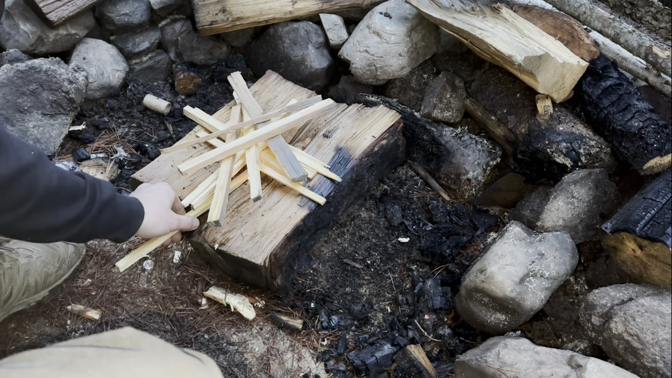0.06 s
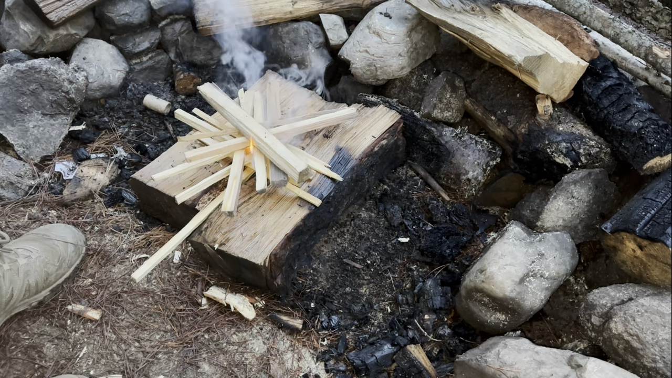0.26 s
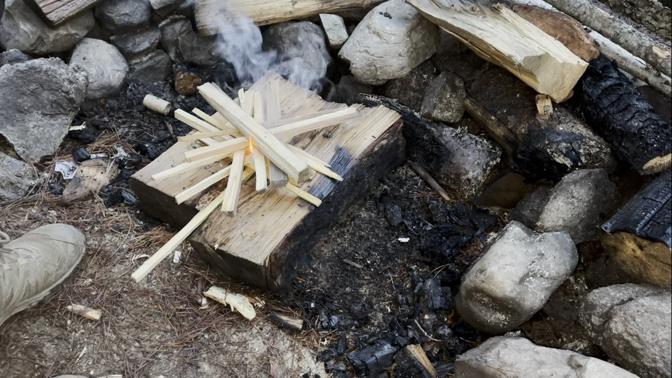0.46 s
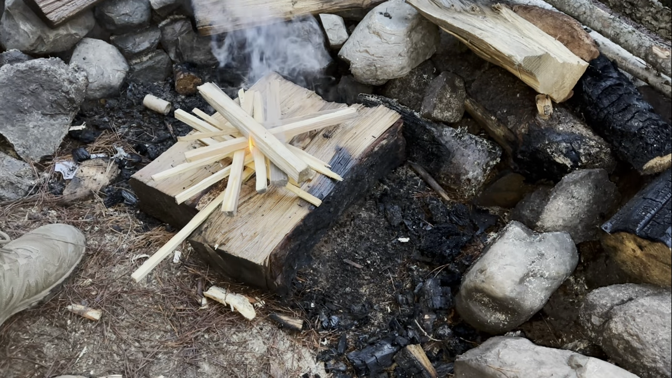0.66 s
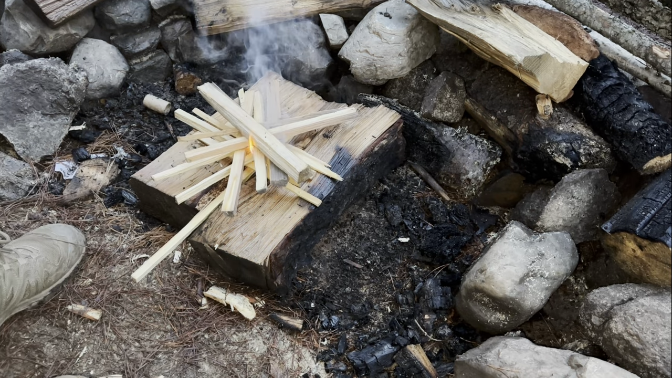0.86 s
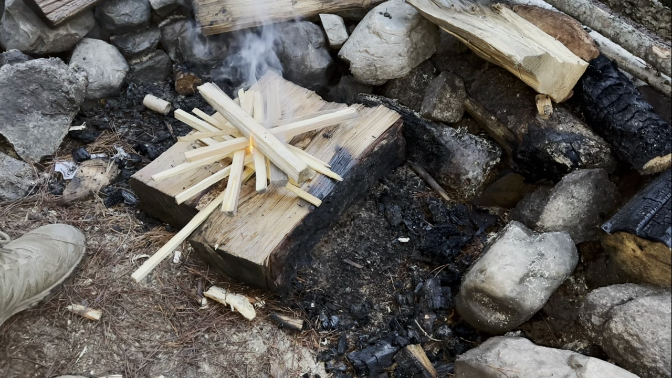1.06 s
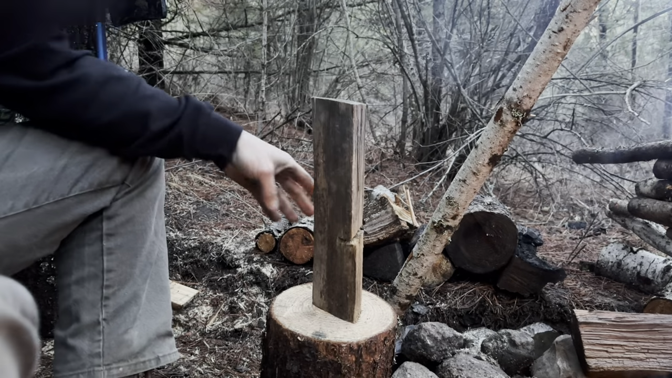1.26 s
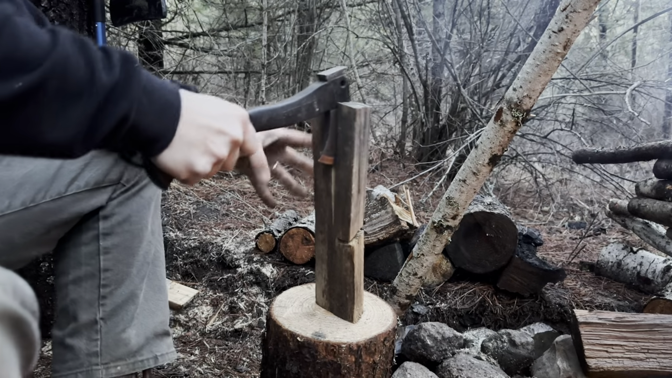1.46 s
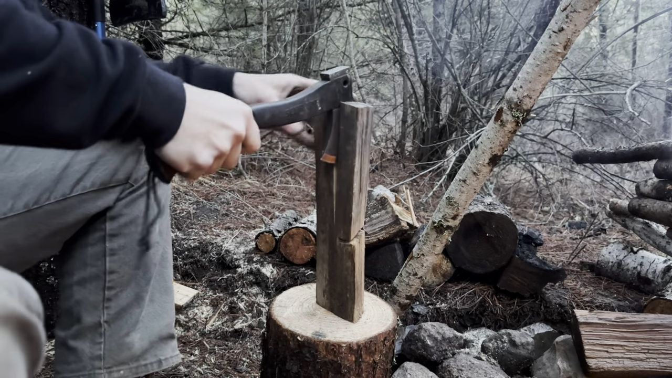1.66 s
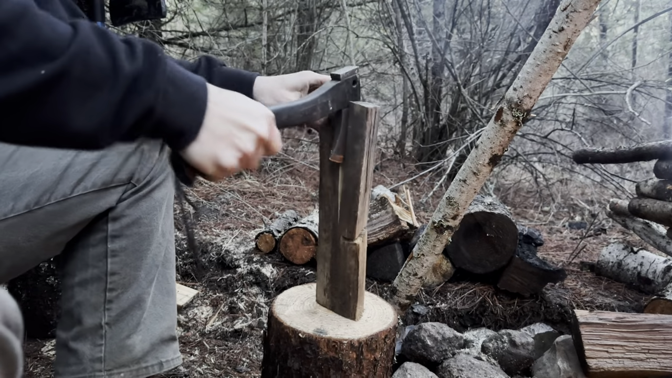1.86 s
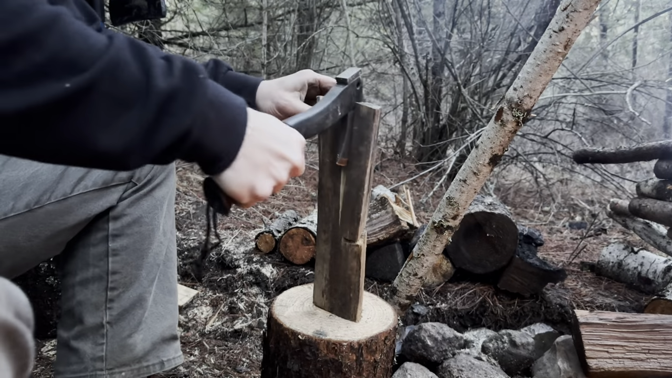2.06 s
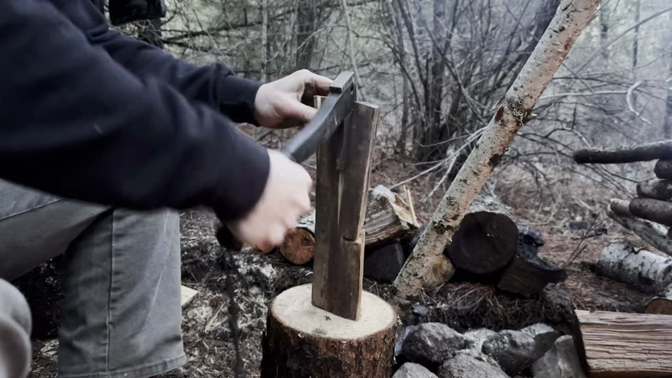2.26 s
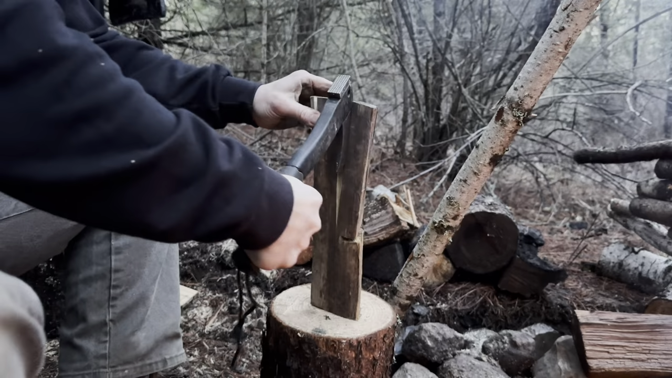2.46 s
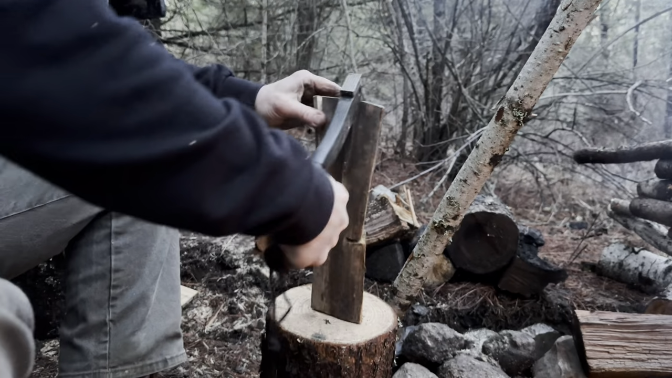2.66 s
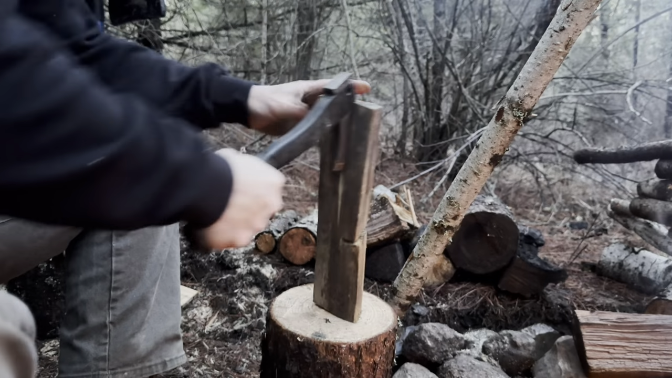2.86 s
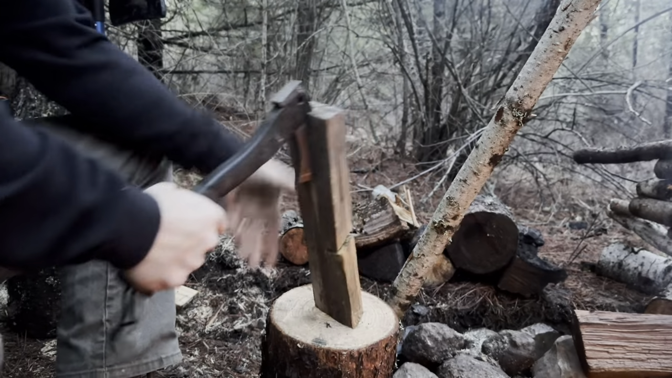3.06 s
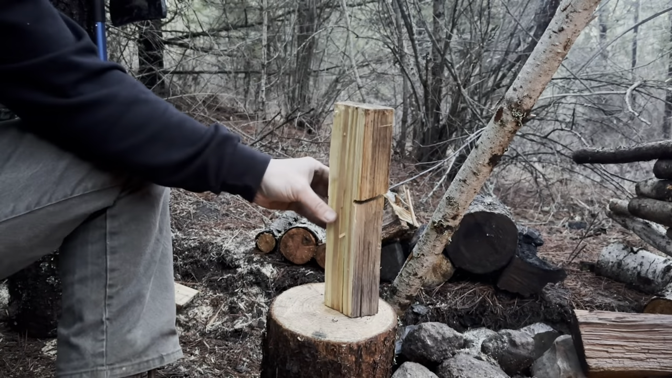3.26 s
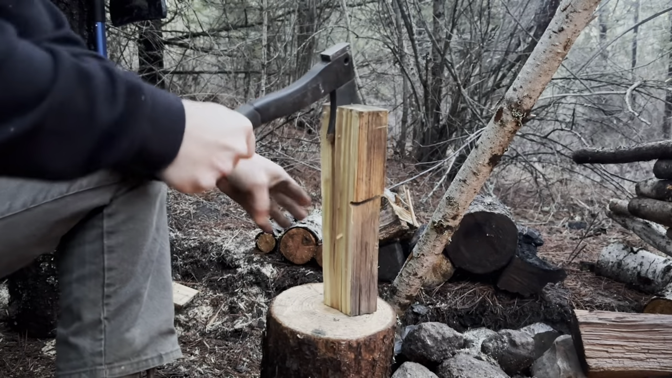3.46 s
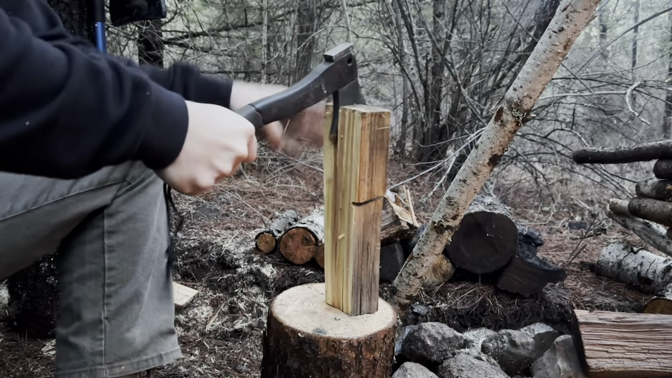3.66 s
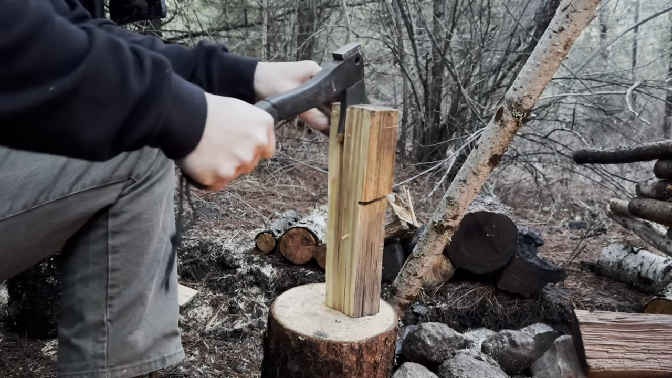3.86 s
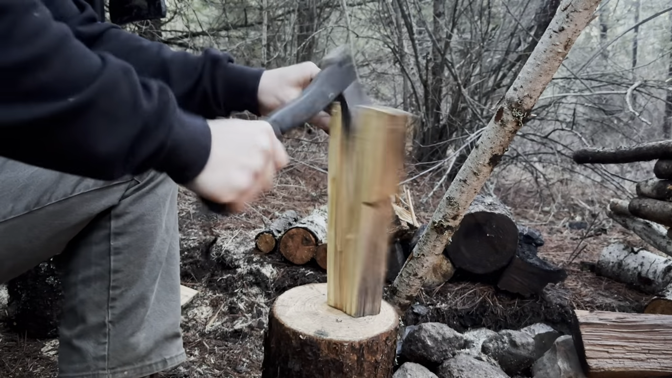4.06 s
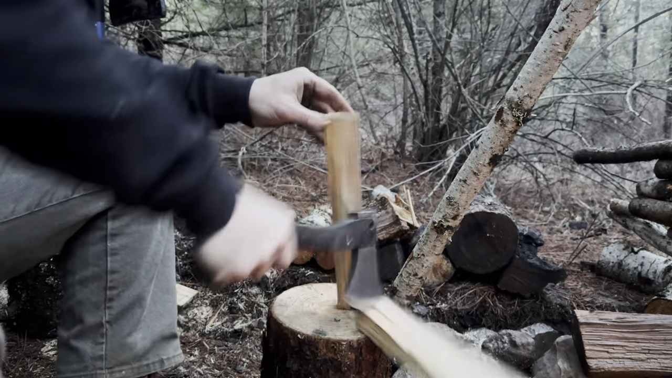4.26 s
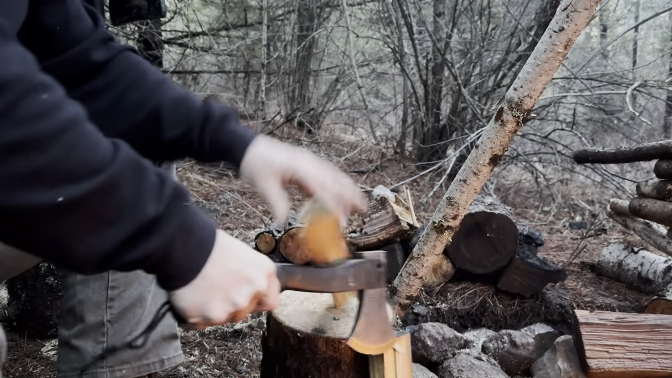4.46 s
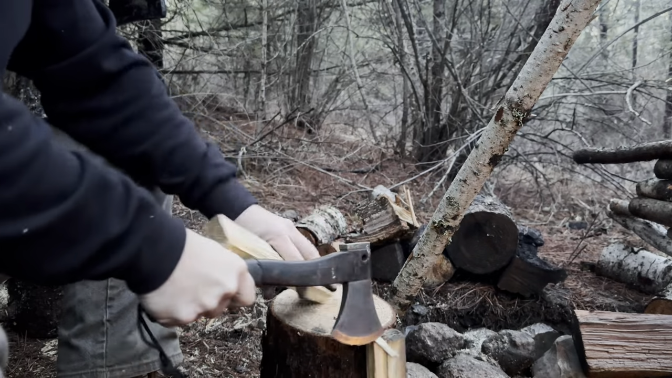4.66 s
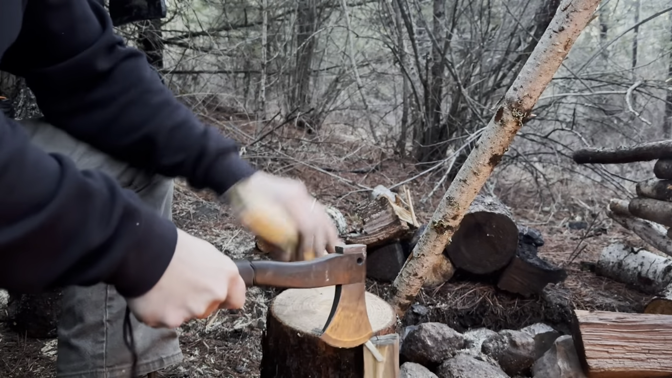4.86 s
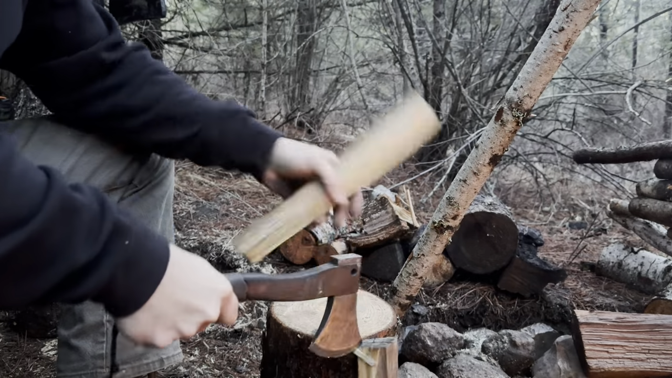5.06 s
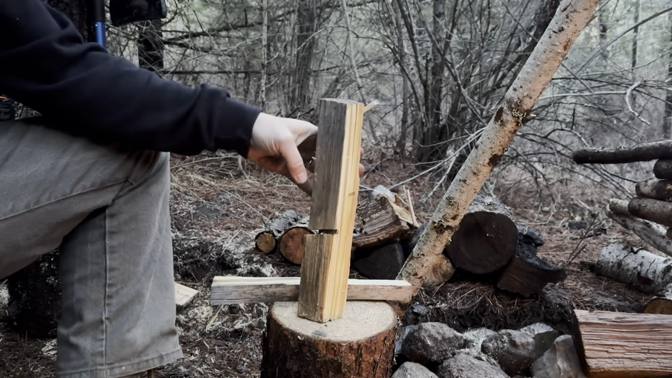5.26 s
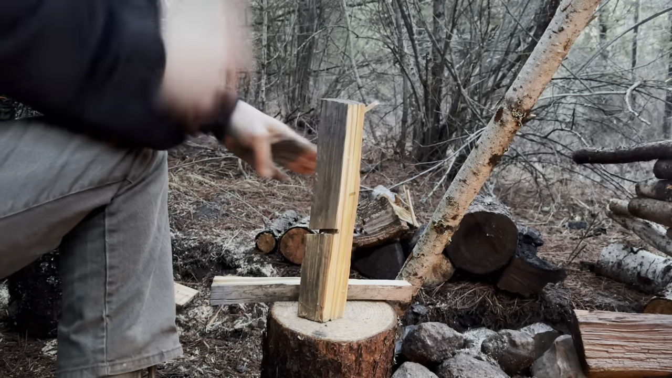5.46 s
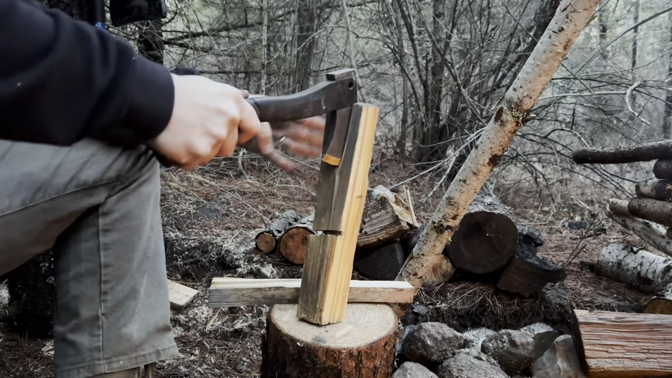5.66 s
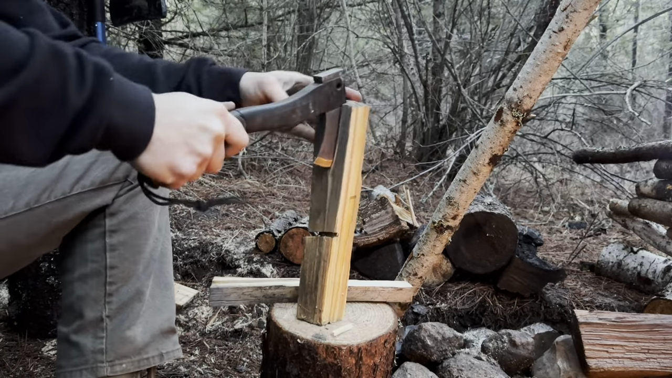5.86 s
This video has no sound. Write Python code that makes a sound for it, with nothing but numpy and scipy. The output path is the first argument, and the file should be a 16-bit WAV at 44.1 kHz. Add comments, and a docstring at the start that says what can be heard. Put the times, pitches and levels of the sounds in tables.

```python
"""Over a low rumble and faint air in the woods, clothes rustle, boots shuffle and small taps lead up to the first blow.
A hatchet bites into a billet (a short log) on a stump, and billet and hatchet are knocked down together, blow by blow.
The wood cracks, tears apart and the pieces tumble; the next billet is set up, and a last blow cracks it.
Random snaps of fibre, filtered and sent through ringing wood, make the blows; scattered echoes give a faint tail."""
import sys
import numpy as np
from scipy import signal
from scipy.fft import rfft, irfft, next_fast_len
from scipy.io import wavfile
from scipy.ndimage import uniform_filter1d

SR = 44100
rng = np.random.default_rng(int(sys.argv[2]) if len(sys.argv) > 2 else 0)


def dump_mix(stems):
    """Bounce the given channels to the path in sys.argv[1] as a 16-bit WAV at rate SR."""
    frames = np.atleast_2d(stems).T  # one column per channel
    limited = np.clip(frames, -1, 1)  # hard clip at full scale
    pcm = np.round(limited * 32767).astype(np.int16)
    wavfile.write(sys.argv[1], SR, pcm)


N = 260631

BLOW_SAMPLES = 8192  # room for one short wooden sound
LEAD_IN_S = .003  # each short wooden sound swells in for this long before its main push

# The hatchet strikes. Each row: time in seconds, time over which fibres snap in seconds, knock in Hz,
# knock level in dB, clack in Hz, clack level in dB, crack level in dB, thump delay in seconds, thump level in dB.
CHOP_BLOWS = [(1.2969, 0.0012, 562, -28, 2100, -21.5, -19, .011, -37.5),
              (2.273, .0013, 660, -36.5, 2040, -31.5, -24.5, 0, -38.5),
              (3.3443, 0.0021, 857, -19.5, 1949, -19, -17, 0.014, -38.5),
              (4.033, 0.0027, 1027, -45, 1695, -26, -19.5, .003, -69),
              (5.4585, .0029, 780, -21.5, 1700, -20.5, -19.5, .008, -38)]
# Split pieces and the hatchet land on stump and ground. Each row: time in seconds, knock in Hz,
# knock level in dB, crack level in dB, thump level in dB, left minus right in dB.
PIECE_LANDINGS = [(4.089, 857, -37, -39, -40.5, 1.5), (4.213, 406, -43.5, -49, -58, -3),
                  (4.2281, 611, -31, -42, -38.5, -2), (4.2481, 453, -30.5, -47, -51, -1),
                  (4.3746, 568, -28, -30, -37, -4), (4.415, 454, -50, -67, -43, 3),
                  (4.458, 556, -42, -66, -42.5, 3)]
# Colour of the cracks as heard through the microphones: bright near 8.6 kHz, hollow near 11 kHz.
# Each row: frequency in Hz, level in dB.
CRACK_SPECTRUM = [(1000, -35), (2500, -18.5), (3500, -2.5), (4600, -4), (6200, -5.5), (7200, -2),
                  (8600, 2.5), (9500, -3.5), (10300, -25), (11400, -29.5), (13000, -8.5), (15500, -16)]


def from_db(db):
    """Turn decibels into a gain."""
    return 10 ** (np.asarray(db) / 20)


def rms_one(x):
    """Scale a sound to an average (rms) strength of 1."""
    return x / np.sqrt(np.mean(x ** 2) + 1e-20)


def burst(x, db):
    """Scale a short sound so that its energy, spread over 10 ms, has this level."""
    energy = np.mean(np.sum(x ** 2, axis=-1))
    return x * from_db(db) / np.sqrt(energy / (.01 * SR) + 1e-20)


def at_hz(points, hz):
    """Read each column of a spectrum at these frequencies, on a logarithmic pitch scale."""
    f, *columns = np.transpose(points)
    return [np.interp(np.log(np.maximum(hz, 1)), np.log(f), column) for column in columns]


def coloured(x, spectrum):
    """Give a sound this spectrum with a filter that never answers early (minimum phase)."""
    size = 2 * next_fast_len(x.shape[-1])
    level_db = at_hz(spectrum, np.fft.rfftfreq(size, 1 / SR))[0]
    # folding the cepstrum onto positive times makes the filter minimum-phase
    cepstrum = irfft(np.log(from_db(level_db)))
    cepstrum[1:size // 2] *= 2
    cepstrum[size // 2 + 1:] = 0
    return irfft(rfft(x, size) * np.exp(rfft(cepstrum)))[..., :x.shape[-1]]


def band(x, hz, spread, order=2):
    """A broad, quickly damped resonance around hz."""
    ratio = 1 + abs(spread)
    edges = [hz / ratio, min(hz * ratio, .45 * SR)]
    return signal.sosfilt(signal.butter(order, edges, "band", fs=SR, output="sos"), x + 1e-18)


def ring(x, modes, detune):
    """Decaying tones; every contact point gives them other strengths and slightly other pitches."""
    t = np.arange(BLOW_SAMPLES) / SR
    luck = rng.standard_normal((len(modes), 2))
    tone = 0
    for (hz, db, t60), (strength, pitch) in zip(modes, luck):
        fade = from_db(db + 2 * strength - 60 * t / t60)
        tone = tone + fade * np.sin(2 * np.pi * hz * (1 + detune * pitch) * t)
    return signal.fftconvolve(x, tone[None], axes=-1)[:, :BLOW_SAMPLES]


def add(out, s, x):
    """Mix a short sound in at time s."""
    start = round(s * SR)
    out[:, start:start + x.shape[-1]] += x[:, :N - start]


def grains(size, per_s, spread_db, apart):
    """Random snaps of uneven strength; each microphone also gets some of its own."""
    strength_db = spread_db * np.minimum(rng.exponential(1, (3, size)), 4)
    sizes = from_db(strength_db) * rng.choice([-1, 1], (3, size))
    snaps = sizes * (rng.random((3, size)) < per_s / SR)
    return rms_one(snaps[0] + apart * snaps[1:])


def surge(s, rise_s, fall_s):
    """An envelope that grows to 1 at time s and dies away."""
    t = np.arange(N) / SR - s
    growth = np.minimum(t / max(rise_s, 1e-4), -t / max(fall_s, 1e-4))
    return np.exp(np.maximum(growth, -40))


def together(gains):
    """Unrelated sounds add in power."""
    return np.sqrt(sum(gain ** 2 for gain in gains))


def flutter():
    """Cloth catches and slips, so its level wavers at random."""
    flutter_db, flutter_s = 2.5, 0.027
    width = max(round(flutter_s * SR), 1)
    slow = uniform_filter1d(uniform_filter1d(rng.standard_normal(N), width), width)
    return from_db(flutter_db * rms_one(slow))


def movement():
    """Gains of rustle, rubbing, shuffle and rumble: rest, single movements, and a swing into every chop."""
    # Arms and legs move. Each row: time in seconds, half length in seconds, rustling level in dB,
    # cloth rubbing level in dB, shuffling level in dB.
    moves = [(1.195, 0.1, -84.5, -99, -64), (1.83, 0.17, -72.5, -81, -82),
             (2.203, 0.061, -69.5, -69.5, -64.5), (2.45, .12, -83.5, -88, -69.5),
             (2.75, 0.082, -75.5, -81.5, -68.5), (2.964, 0.1, -69, -97, -71),
             (3.116, 0.089, -64, -68.5, -71), (3.183, 0.029, -55.5, -64.5, -85),
             (3.861, 0.22, -79.5, -89, -85), (4.279, 0.012, -52.5, -62, -67),
             (4.347, 0.033, -57.5, -67, -65), (4.552, 0.18, -62.5, -77, -73),
             (4.852, 0.44, -70, -81, -65.5), (5.172, 0.032, -67.5, -76, -69),
             (5.782, 0.25, -75.5, -81, -70.5)]
    rest_rustle_db, rest_shuffle_db = -84, -76
    swing_rustle_db, swing_shuffle_db, swing_rise_s, swing_stop_s = -61.5, -65, .06, .03
    rumble_db, rumble_over_shuffle_db = -62.5, 9
    shudder_over_thump_db, shudder_rise_s, shudder_fall_s = -8, .012, 0.065

    t = np.arange(N) / SR
    # the arm swings faster and faster, and stops
    swings = sum(surge(s, swing_rise_s, swing_stop_s) for s, *_ in CHOP_BLOWS)
    rustle = [from_db(rest_rustle_db), from_db(swing_rustle_db) * swings]
    shuffle = [from_db(rest_shuffle_db), from_db(swing_shuffle_db) * swings]
    rub = []
    for s, half_s, rustle_db, rub_db, shuffle_db in moves:
        swell = np.exp(-np.minimum(((t - s) / half_s) ** 2, 40))
        rustle.append(from_db(rustle_db) * swell)
        rub.append(from_db(rub_db) * swell)
        shuffle.append(from_db(shuffle_db) * swell)

    # the ground shudders after each chop, and the rumble swells with the shuffling
    shudder = sum(from_db(thump_db + shudder_over_thump_db)
                  * surge(s + 2 * shudder_rise_s, shudder_rise_s, shudder_fall_s)
                  for s, *_, thump_db in CHOP_BLOWS)
    rumble = [from_db(rumble_db), from_db(rumble_over_shuffle_db) * together(shuffle), shudder]
    return together(rustle), together(rub), together(shuffle), together(rumble)


def background():
    """Cloth and dry needles rustle, boots shuffle, and the air rumbles and hisses faintly."""
    # Four colours as heard through the microphones: rustle, shuffle, rumble and steady forest air.
    # Each row: frequency in Hz, level in dB.
    rustle_spectrum = [(400, -16.5), (1200, -3.5), (2200, -5.5), (3100, -8), (4500, -5.5), (5900, -7.5),
                       (8600, 0), (9500, -5.5), (10500, -32), (12000, -29.5), (13500, -13.5), (16000, -16)]
    shuffle_spectrum = [(60, -14.5), (160, 8), (300, -3.5), (550, -0.5), (1000, -12.5), (2500, -45)]
    rumble_spectrum = [(15, -32), (30, -16), (50, 3.5), (75, 4.5), (110, 0), (160, -8.5), (260, -20.5),
                       (600, -42), (2000, -65.5)]
    air_spectrum = [(200, 4), (450, -2), (900, -9.5), (1500, -10), (2300, -6), (4000, -14.5), (6000, -17.5),
                    (8500, -23), (9700, -26), (11000, -37.5), (13500, -36.5), (16000, -37)]
    # The background dips briefly. Each row: time in seconds, half width in seconds, depth in dB.
    dips = [(0.12, 0.015, -16), (1.122, 0.017, -25), (3.231, 0.0087, -26.5), (5.259, 0.018, -17)]
    air_db, rub_hz = -79, 2100

    rustle_gain, rub_gain, shuffle_gain, rumble_gain = movement()
    dense = grains(N, per_s=2900, spread_db=3.0, apart=1.1)
    sparse = grains(N, per_s=580, spread_db=0.5, apart=.6)
    cloth = dense + from_db(-10.5) * sparse
    rustle = rustle_gain * flutter() * rms_one(coloured(cloth, rustle_spectrum))
    scuffs = grains(N, per_s=700, spread_db=2.5, apart=.4)
    shuffle = shuffle_gain * rms_one(coloured(scuffs, shuffle_spectrum))
    rumbling = grains(N, per_s=3600, spread_db=1.0, apart=.1)
    rumble = rumble_gain * rms_one(coloured(rumbling, rumble_spectrum))
    hiss = grains(N, per_s=28000, spread_db=2.0, apart=0.23)
    air = from_db(air_db) * rms_one(coloured(hiss, air_spectrum))
    # cloth slides on cloth
    sliding = grains(N, per_s=9000, spread_db=3.5, apart=1.0)
    rub = rub_gain * flutter() * rms_one(band(sliding, rub_hz, spread=.35))

    t = np.arange(N) / SR
    dips_db = sum(db * np.exp(-((t - s) / width) ** 2) for s, width, db in dips)
    rustle = rustle * from_db([[1], [-1]])  # stronger on the left
    return (rustle + rub + shuffle + rumble + air) * from_db(dips_db)


def weights():
    """List everything that presses on the ground: time in seconds, level in dB, lowest ring in Hz."""
    # Boots and knees press on the soil. Each row: time in seconds, level in dB.
    steps = [(2.683, -62), (2.781, -61), (2.906, -57.5), (3.262, -53.5), (4.995, -46), (5.373, -50),
             (5.709, -51), (5.858, -55)]
    chop_hz, landing_hz, step_hz = 59.3, 102.26, 78
    # the stump takes the weight of most chops a moment later
    return ([(s + delay_s, db, chop_hz) for s, *_, delay_s, db in CHOP_BLOWS]
            + [(s, db, landing_hz) for s, *_, db, _ in PIECE_LANDINGS]
            + [(s, db, step_hz) for s, db in steps])


def thumps():
    """A soft push rocks the stump on the soil; lighter pieces give a higher thud."""
    # Stump on soft ground. Each row: multiple of its lowest ring, relative level in dB,
    # time to fade by 60 dB in seconds.
    stump_modes = [(1., 0, .07), (1.55, 4, 0.034), (2.449, 2, 0.028), (3.8, -6, .025)]
    out = np.zeros((2, N))
    push = signal.windows.hann(BLOW_SAMPLES // 64)
    push = np.pad(push, (0, BLOW_SAMPLES - len(push)))[None]
    for s, db, hz in weights():
        modes = [(hz * multiple, level, t60) for multiple, level, t60 in stump_modes]
        thud = ring(push, modes, detune=0.01)
        add(out, s, burst(band(thud, 6.2 * hz, spread=2.3), db))
    return out


def contact(snap_s, snap_db, apart, rise_s=0.0016):
    """A shower of snaps swells in, peaks with one push, and dies away."""
    t = (np.arange(BLOW_SAMPLES) - round(LEAD_IN_S * SR)) / SR
    swell = np.exp(np.minimum(t / max(rise_s, 1e-4), -t / max(snap_s, 1e-4)))
    shower = grains(BLOW_SAMPLES, per_s=12000, spread_db=4.5, apart=apart) * swell
    push = 1. * (t == 0)
    return burst(push, 0) + burst(shower, snap_db)


def ticks():
    """Light contacts of blade and wood in the hands: the same wood, barely excited."""
    # Small taps and creaks. Each row: time in seconds, level in dB,
    # brightness in dB (raises the crack and lowers the knock).
    taps = [(1.052, -74.5, -5.5), (1.175, -78, -4.5), (1.253, -71.5, 2.5), (1.705, -74.5, 5),
            (1.814, -62.5, -1.5), (1.872, -64.5, 7.5), (1.913, -55, 5), (1.945, -49.5, 0.5),
            (2.221, -55.5, 3.5), (2.371, -68, 7.5), (2.557, -73, 5), (2.687, -69.5, -6.5),
            (2.776, -67.5, -3), (3.183, -64, 12.5), (3.828, -70, 18.5), (3.949, -58, 17),
            (3.994, -53, 12.5), (4.006, -53, 14), (4.204, -57.5, 2), (4.446, -56.5, 5), (4.478, -59.5, 3),
            (4.588, -60, 1), (4.961, -60.5, 1.5), (4.999, -56.5, -3), (5.625, -68.5, 8.5),
            (5.841, -72.5, -5)]
    # a duller touch lasts longer: its length doubles for this many dB less brightness
    touch_s, doubling_db = 0.0056, 25.5
    # the brightest touches are single fibres that snap high up; the crack takes a share of the brightness
    fibre_hz, fibre_db, crack_share, clack_over_db = 8450, -3.5, 0.48, -1.5

    out = np.zeros((2, N))
    for s, db, bright_db in taps:
        snap_s = touch_s * 2 ** (-bright_db / doubling_db)
        touch = contact(snap_s, snap_db=5, apart=.6, rise_s=.0003)
        knock = burst(band(touch, 630, spread=.8), db - bright_db)
        clack = burst(band(touch, 2100, spread=0.25), db + clack_over_db)
        crack = burst(coloured(touch, CRACK_SPECTRUM), db + crack_share * bright_db)
        fibre = burst(band(touch, fibre_hz, spread=0.089, order=3), db + bright_db + fibre_db)
        add(out, s - LEAD_IN_S, knock + clack + crack + fibre)
    return out


def tearing():
    """The last fibres let go in a dense crackle; the blade scrapes down the split and the billet resounds."""
    # The split bursts open, then the blade scrapes harder and harder until the halves part.
    # Each row: time of the peak in seconds, level in dB, rise in seconds, fall in seconds.
    tears = [(4.027, -34.5, 0.0026, 0.016), (4.069, -45, 0.0064, 0.026), (4.155, -38, .03, 0.013)]
    fibres = grains(N, per_s=6000, spread_db=3.0, apart=.7)
    body = band(fibres, 1300, spread=.1, order=1) + .7 * band(fibres, 2400, spread=.15, order=1)
    low = from_db(-11.0) * rms_one(band(fibres, 600, spread=1.0))
    crackle = rms_one(coloured(fibres, CRACK_SPECTRUM)) + rms_one(body) + low
    return crackle * together(from_db(db) * surge(s, rise_s, fall_s) for s, db, rise_s, fall_s in tears)


def contacts():
    """List the wood contacts: the first seven columns of the chops, then free ringing and left minus right in dB."""
    # The blade drives on and the billet gives again. Each row: the first seven columns of the chops.
    aftercracks = [(1.3102, .0042, 1067, -32, 1960, -38, -40.5),
                   (1.313, .005, 325.8, -38.5, 2248, -33.5, -35.5), (3.356, .003, 660, -36, 1770, -32, -23),
                   (4.0396, 0.0037, 1188, -44.5, 2543, -27.5, -20),
                   (4.0453, 0.0029, 1207, -43, 2040, -26.5, -22.5),
                   (4.0504, .005, 717, -30.5, 2195, -27.5, -20.5),
                   (5.4648, 0.0023, 744, -37, 3190, -56, -19), (5.4757, .0094, 814, -37.5, 3215, -35, -26)]
    # Loose pieces knock against each other. Each row: time in seconds, knock in Hz, knock level in dB,
    # clack level in dB, crack level in dB.
    clatter = [(4.158, 1340, -51.5, -38.5, -58), (4.1716, 680, -45.5, -38, -36.5),
               (4.3815, 735, -35, -65, -41), (4.414, 1123, -48.5, -74, -51.5),
               (4.6504, 1067, -53, -54.5, -60)]
    # a billet held on the stump hardly rings; opened, it rings more freely; loose pieces ring most
    held_db, opened_db, landing_db, loose_db = -16.5, -9, -13, -1
    landing_snap_s, landing_clack_hz, landing_clack_over_knock_db = 0.005, 2210, -6
    clatter_snap_s, clatter_clack_hz = 0.0073, 1430

    for *wood, _, _ in CHOP_BLOWS:
        yield *wood, held_db, 0
    for row in aftercracks:
        yield *row, opened_db, 0
    for s, knock_hz, knock_db, crack_db, _, pan_db in PIECE_LANDINGS:
        clack_db = knock_db + landing_clack_over_knock_db
        yield (s, landing_snap_s, knock_hz, knock_db, landing_clack_hz, clack_db, crack_db,
               landing_db, pan_db)
    for s, knock_hz, knock_db, clack_db, crack_db in clatter:
        yield (s, clatter_snap_s, knock_hz, knock_db, clatter_clack_hz, clack_db, crack_db,
               loose_db, 0)


def blows(grain_db):
    """Fibres crack, and the billet answers with a clack, a lower knock and a short ring."""
    # Ringing of the billet. Each row: frequency in Hz, relative level in dB,
    # time to fade by 60 dB in seconds.
    billet_modes = [(735, 2, 0.045), (1040.3, -4.5, .032), (1183, -7, 0.12), (1670, -5, .05),
                    (2023, -2.5, 0.042), (2270, -5.5, .08), (2700, -12.5, 0.032), (4180, -10.5, .07),
                    (4630, -9.5, 0.064), (6850, -13.5, .045)]
    out = np.zeros((2, N))
    for s, snap_s, knock_hz, knock_db, clack_hz, clack_db, crack_db, free_db, pan_db in contacts():
        crack = coloured(contact(snap_s, grain_db + 14.5, apart=1.0), CRACK_SPECTRUM)
        clack = band(contact(snap_s, grain_db + 5.0, apart=1.0), clack_hz, spread=0.27)
        push = contact(snap_s, grain_db - 8.0, apart=0.9)
        knock = band(push, knock_hz, spread=.7, order=3)
        # the two strongest bending modes ring on when a piece is loose
        low_bend = ring(push, [(knock_hz, 0, .06)], detune=0)
        high_bend = ring(push, [(clack_hz, 0, .05)], detune=0)
        rings = ring(contact(snap_s, grain_db - 2, apart=1.0), billet_modes, detune=0.016)
        wood = burst(clack, clack_db) + burst(knock, knock_db) + burst(rings, clack_db - 8.5)
        bends = burst(low_bend, knock_db + free_db) + burst(high_bend, clack_db + free_db)
        left_right = from_db([[pan_db / 2], [-pan_db / 2]])
        add(out, s - LEAD_IN_S, (burst(crack, crack_db) + wood + bends) * left_right)
    return out


def lows_late(x, cycles):
    """The lower the sound, the later it comes: most frequencies come about this many own cycles late."""
    size = 2 * next_fast_len(N)
    hz = np.fft.rfftfreq(size, 1 / SR)
    return irfft(rfft(x, size) * np.exp(-2j * np.pi * cycles * np.log1p(hz / 30)))[:, :N]


def at_microphones(x):
    """The chopping block reaches the two microphones with different level and phase."""
    # Each row: frequency in Hz, left minus right in dB.
    balance = [(200, -2), (600, 2), (1100, -1.5), (2100, 0), (4300, 2.5), (8000, 4.5), (13000, -0.5)]
    # Each row: frequency in Hz, lead of the left in radians.
    phase = [(150, 0), (500, .2), (1000, 0), (2100, .7), (4300, 1.2), (6000, .4), (8000, -.4), (10000, -.3),
             (13000, .7)]
    size = 2 * next_fast_len(N)
    hz = np.fft.rfftfreq(size, 1 / SR)
    half = np.array([[.5], [-.5]])
    ports = from_db(half * at_hz(balance, hz)[0]) * np.exp(1j * half * at_hz(phase, hz)[0])
    return irfft(rfft(x, size) * ports)[:, :N]


def stereo_noise():
    """One second of diffuse sound as a spectrum; long waves reach both microphones alike."""
    hz = np.fft.rfftfreq(SR, 1 / SR)
    mid, side = rfft(rng.standard_normal((2, SR)))
    alike = 1 / (1 + (hz / 500) ** 2)
    return np.sqrt((1 + alike) / 2) * mid + np.sqrt((1 - alike) / 2) * side * [[1], [-1]]


def echoes(x, table, onset_s):
    """Dense scatter that builds up, then dies away band by band."""
    t = np.arange(SR) / SR
    hz = np.fft.rfftfreq(SR, 1 / SR)
    white = stereo_noise()
    centres = [row[0] for row in table]
    response = 0
    # each band's share is 1 at its own centre and falls to 0 at its neighbours
    for share, (_, db, t60) in zip(np.eye(len(table)), table):
        fade = rms_one(from_db(-60 * t / t60) * (1 - np.exp(-(t / onset_s) ** 2)))
        noise = irfft(white * np.interp(hz, centres, share), SR)
        response = response + noise * from_db(db) * fade / np.sqrt(SR)
    return signal.fftconvolve(x, response, axes=-1)[:, :N]


def scene():
    """The work at the block, its echoes and the background."""
    # Quick scatter from ground, logs and the chopper's body, then echoes among the trees.
    # Each row: frequency in Hz, level in dB, time to fade by 60 dB in seconds.
    nearby = [(300, -11, 0.073), (1000, -16.5, 0.061), (3120, -7.5, 0.11), (8350, -11, 0.092),
              (15000, -15.5, 0.083)]
    forest = [(200, -20.5, 0.28), (500, -30, .45), (1230, -24, 0.57), (2600, -24.5, .76),
              (4160, -15.5, 0.33), (8000, -23, 0.41), (15000, -28.5, .28)]
    small = ticks() + tearing()
    work = blows(grain_db=3.0) + small + thumps()
    direct = at_microphones(lows_late(work, cycles=.9))
    # the surroundings hear each blow from all sides, which evens out the grain of single fibres
    radiated = at_microphones(lows_late(blows(grain_db=-17.5) + small, cycles=.9))
    scatter = echoes(radiated, nearby, onset_s=0.0056)
    tail = echoes(radiated, forest, onset_s=0.0029)
    return direct + scatter + tail + background()


def record(dry):
    """The highest peaks are rounded and the top is cut."""
    cutoff_hz = 16300
    rounded = .95 * np.tanh(dry / .95)
    return signal.sosfilt(signal.ellip(10, .1, 80, cutoff_hz, fs=SR, output="sos"), rounded)


dry = scene()
out = record(dry)
dump_mix(out)
```